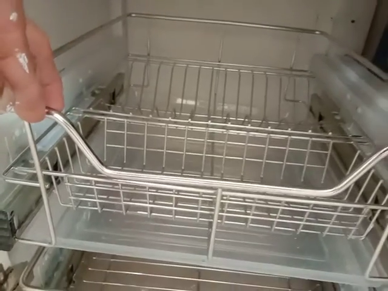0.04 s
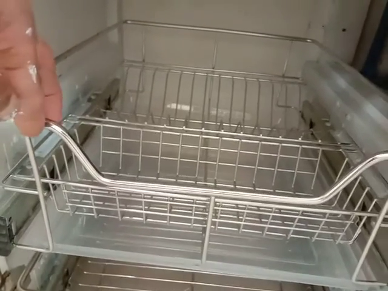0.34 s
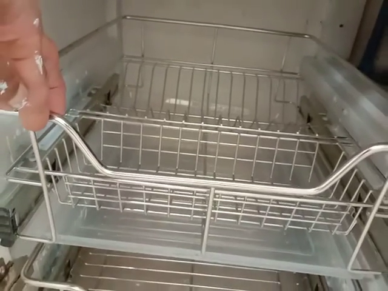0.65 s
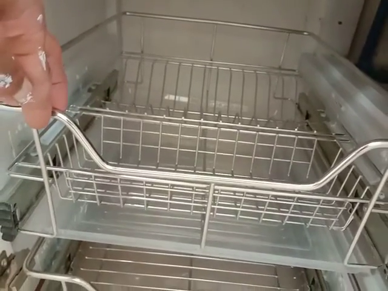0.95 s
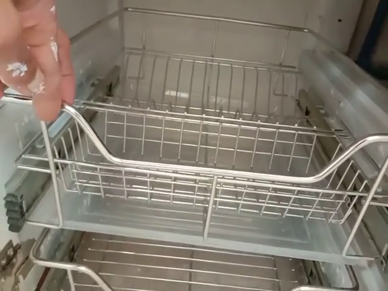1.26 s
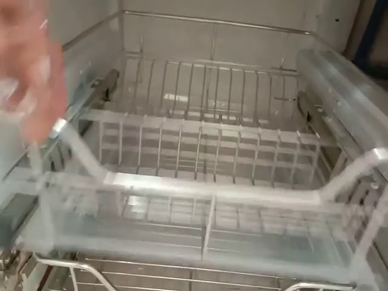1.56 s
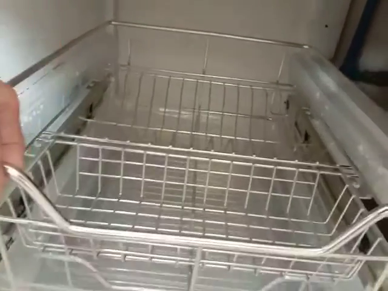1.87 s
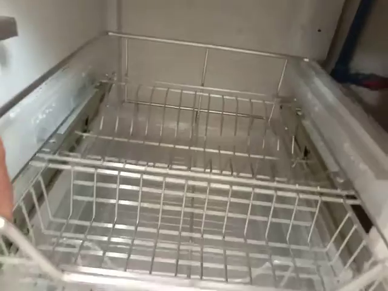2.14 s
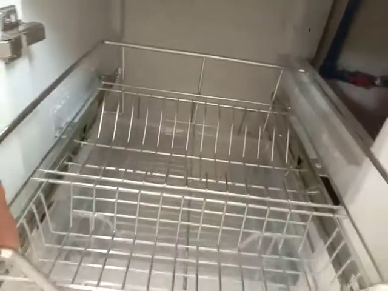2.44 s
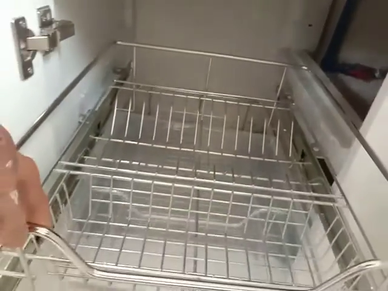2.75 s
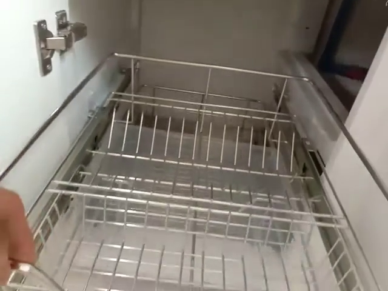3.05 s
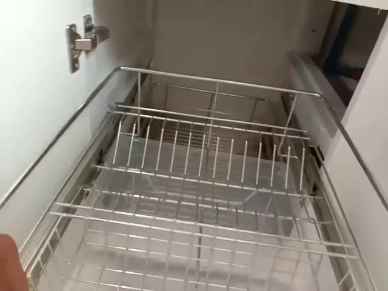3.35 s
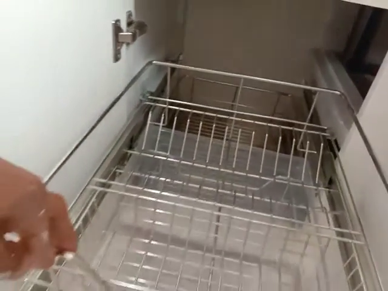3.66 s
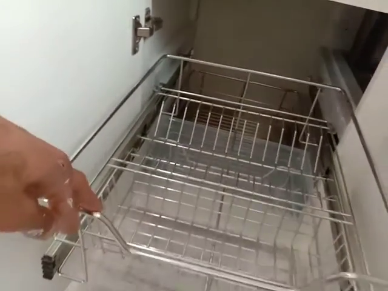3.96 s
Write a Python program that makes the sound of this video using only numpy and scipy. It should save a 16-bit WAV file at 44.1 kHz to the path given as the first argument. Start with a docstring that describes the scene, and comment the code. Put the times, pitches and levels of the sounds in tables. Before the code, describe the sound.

A wire basket drawer rattles lightly at about 0.7 seconds, then starts rolling out of its cabinet with a thump at 1.5 seconds, rumbling and knocking on the rails. A catch ticks around 2.2 and 2.5 seconds. A second, softer pull ends in a sharp, ringing metal clack at 3.4 seconds, and the rattling fades. A strong hiss runs throughout, occasionally swelling into a faint whistle.

```python
"""A wire basket drawer is pulled out of a kitchen cabinet in two goes. The basket shudders when tugged,
its rollers rumble on the rails and jolt over joints, the cabinet booms, and a catch ticks.
At the end stop, metal hits metal: the basket clacks and its wires ring.
A strong hiss that swells now and then into a faint whistle fills the kitchen throughout."""
import sys
import numpy as np
from scipy import signal
from scipy.fft import rfft, irfft
from scipy.io import wavfile
from scipy.ndimage import uniform_filter1d, map_coordinates

SR = 44100
rng = np.random.default_rng(int(sys.argv[2]) if len(sys.argv) > 2 else 0)


def generate_wav(sig):
    """Save sig (samples, or channels by samples) to the path in sys.argv[1] as 16-bit PCM at SR."""
    pcm = np.round(np.clip(np.atleast_2d(sig).T, -1, 1) * 32767).astype(np.int16)
    wavfile.write(sys.argv[1], SR, pcm)


N = 176400
T = np.arange(N) / SR  # time of each sample [s]


def amp(db):
    """Turn decibels into a factor to multiply a sound by."""
    return 10 ** (np.asarray(db) / 20)


def unit(x):
    """Scale a signal to an average strength (rms) of 1."""
    return x / np.sqrt(np.mean(x ** 2))


def curve(rows, column=1):
    """Follow one column of a table over time, joining its points with straight lines."""
    rows = np.array(rows)
    return np.interp(T, rows[:, 0], rows[:, column])


def noise():
    """White noise: all pitches equally strong."""
    return rng.standard_normal(N)


def colour(x, tone):
    """Make some pitches louder and others softer, following (frequency [Hz], gain [dB]) points."""
    hz, db = np.array(tone).T
    freqs = np.maximum(np.arange(N + 1) * SR / (2 * N), 1)
    gain = amp(np.interp(np.log(freqs), np.log(hz), db))
    cepstrum = irfft(np.log(gain))
    # fold it so that the filter never sounds before its input does
    cepstrum[1:N] *= 2
    cepstrum[N + 1:] = 0
    return irfft(rfft(x, 2 * N) * np.exp(rfft(cepstrum)))[:N]


def convolve(x, response):
    """Pass a sound through an object or room, given how that answers one tap."""
    return signal.fftconvolve(x, response)[:N]


def fade(t60, start=0):
    """Jump to 1 at the start, then die away by 60 dB in the fade time of t60 seconds."""
    return (T >= start) * np.exp(-np.log(1000) * np.maximum(T - start, 0) / t60)


def ring(modes):
    """A tapped object rings with several fading tones; the first 20 ms have strength 1."""
    tones = sum((-1) ** k * amp(db) * fade(t60) * np.sin(2 * np.pi * hz * T)
                for k, (hz, db, t60) in enumerate(modes))
    return tones / np.sqrt(np.mean(tones[:882] ** 2))


def push(time, length):
    """A smooth push that adds up to 1; a longer one sounds softer."""
    force = np.exp(-((T - time) / (length / 2)) ** 2)
    return force / force.sum()


def wander(hz):
    """Smooth random motion, mostly slower than hz."""
    freqs = np.arange(N // 2 + 1) * SR / N
    return unit(irfft(rfft(noise()) / (1 + (freqs / hz) ** 2), N))


def flutter(slow_hz, fast_hz):
    """Quick random motion with no slow drift."""
    band = signal.butter(2, [slow_hz, fast_hz], "band", fs=SR, output="sos")
    return unit(signal.sosfilt(band, noise()))


def grains(per_s, spread_db=3.5):
    """Tiny random hits of uneven strength."""
    hits = rng.random(N) < per_s / SR
    return hits * np.sign(noise()) * amp(spread_db * noise())


def resonance(hz, width_hz):
    """Noise gathered around one pitch, which may move."""
    phase = 2 * np.pi * np.cumsum(hz * np.ones(N)) / SR
    return unit(wander(width_hz / 2) * np.cos(phase) + wander(width_hz / 2) * np.sin(phase))


def drift(x, share):
    """Let all pitches of a sound slide up and down together by about this share."""
    position = np.cumsum(1 + share * wander(hz=5))
    return map_coordinates(x, [position], order=3, mode="mirror")


def echoes(x, t60, db):
    """Walls throw the sound back as many fading echoes."""
    tail = noise() * fade(t60, start=0.0024)
    return x + amp(db) * convolve(x, tail / np.linalg.norm(tail))


def hiss():
    """A faintly spitting hiss made of a hollow note, a broad rush, a sharp peak and airy treble."""
    # the hollow note (time [s], pitch [Hz], level [dB])
    hollow = [(0, 802.4, -53), (.58, 794.6, -57.5), (.9, 738, -54.5), (1.25, 856, -67), (1.4, 776, -56),
              (2.5, 800, -56), (3.5, 671.4, -51), (4, 648, -47)]
    # tone of the rush, the peak and the air (frequency [Hz], gain [dB])
    rush_tone = [(25, -18), (70, -24), (130, -10.5), (300, -14.5), (560, -14), (760, -2), (1050, 0.5),
                 (1500, -1.5), (2250, 2.5), (3000, 2.5), (4100, -2), (6000, -3), (9000, -22),
                 (15000, -49.5)]
    peak_tone = [(2500, -30.5), (4200, -18), (4900, -6), (5850, -0.5), (7200, -5.5), (8200, -11.5),
                 (11000, -27.5)]
    air_tone = [(4000, -41), (7500, -2.5), (9700, 1), (11500, -1), (12700, -7.5), (15500, -19)]
    # how the rush and the air rise and fall (time [s], level [dB])
    rush_levels = [(0, -44.5), (.4, -46), (1.4, -45), (2.4, -43.5), (3.22, -42.5), (3.52, -45), (4, -41)]
    air_levels = [(0, -49.5), (2.1, -48), (2.68, -46.5), (3.2, -44), (3.53, -50.5), (3.65, -45), (4, -43)]
    rush_boost_db, peak_db, spit_db, flicker_db = 2, -38.5, -5.5, 0.6
    rush_db = curve(rush_levels) + rush_boost_db
    out = amp(curve(hollow, column=2)) * resonance(curve(hollow), width_hz=130)
    for tone, db in (rush_tone, rush_db), (peak_tone, peak_db), (air_tone, curve(air_levels)):
        spitting = noise() + amp(spit_db) * unit(grains(per_s=1500))
        layer = unit(colour(spitting, tone))
        out = out + layer * amp(db + flicker_db * flutter(slow_hz=7, fast_hz=28))
    return out


def swells():
    """The hiss swells into a wavering whistle with thin, high singing tones."""
    # the swells (peak time [s], half length [s], whistle level [dB], singing level [dB])
    surges = [(0.495, 0.078, -38, -57), (.67, 0.047, -39, -60), (1.15, 0.056, -39.5, -58),
              (1.742, .04, -37, -72), (1.92, 0.068, -40.5, -58), (2.7, 0.14, -35.5, -68),
              (3.175, 0.14, -36.5, -50), (3.66, 0.058, -39.5, -53), (3.887, 0.14, -40.5, -52.5)]
    # the singing tones (pitch [Hz], relative level [dB])
    singing_tones = [(3850, 4.5), (6550, 7.5), (13830, -2)]
    whistle_hz = 5785 * (1 + .02 * wander(hz=10))
    whistle = resonance(whistle_hz, width_hz=870)
    singing = sum(amp(db) * resonance(hz, width_hz=650) for hz, db in singing_tones)
    return sum(np.exp(-((T - t) / half) ** 2) * (amp(whistle_db) * whistle + amp(singing_db) * singing)
               for t, half, whistle_db, singing_db in surges)


def shudders():
    """The basket shudders when the hand tugs it: its wires rattle hollowly over the hum of the frame."""
    # the tugs (time [s], hold [s], pitch of the wires [Hz], level [dB])
    tugs = [(0.671, 0.043, 866, -40.5), (1.488, .135, 1009, -42.5)]
    # the frame's own notes (pitch [Hz], width [Hz], relative level [dB])
    frame_notes = [(154.5, 63, -7.5), (505, 70, -8)]
    out = 0
    for t, hold, wire_hz, db in tugs:
        shake = (T >= t) * (T < t + hold) + fade(t60=.15, start=t + hold)
        frame = sum(amp(note_db) * resonance(hz, width) for hz, width, note_db in frame_notes)
        out = out + amp(db) * shake * (resonance(wire_hz, width_hz=230) + frame)
    return out


def clacks():
    """Metal hits metal: a crack, then the wires clatter against each other and ring."""
    # a light hit at the first tug, then a quick bounce at the end stop (time [s], level [dB])
    hits = [(0.676, -42), (3.3748, -24.5), (3.3766, -22), (3.381, -38)]
    # tone of the crack and the clatter (frequency [Hz], gain [dB])
    crack_tone = [(200, -9), (800, 1.5), (1500, -20), (2400, 7.5), (3100, -2), (3900, -10), (5000, -3.5),
                  (6900, 3), (8500, -6.5), (15000, -21)]
    clatter_tone = [(300, -17), (2800, -1.5), (5000, -17)]
    # the wires' own notes (pitch [Hz], relative level [dB], fade time [s])
    wire_notes = [(1018, -10, 0.2), (2400, -8, 0.1), (2570, -12, 0.14), (2960, 4, 0.14), (4750, 5, 0.13),
                  (7030, -2, 0.16)]
    clatter_db, ring_db = -11, -7.5
    crack = unit(colour(noise(), crack_tone))
    crack *= sum(amp(db) * fade(t60=0.052, start=t) for t, db in hits)
    clatter = unit(colour(grains(per_s=900), clatter_tone))
    clatter *= sum(amp(db + clatter_db) * fade(t60=0.19, start=t) for t, db in hits)
    taps = sum(amp(db) * (np.arange(N) == int(t * SR)) for t, db in hits)
    return crack + clatter + amp(ring_db) * convolve(taps, ring(wire_notes))


def rolling(body):
    """Rollers run over tiny bumps in the rails and shake the cabinet: a low rumble, a brighter rattle."""
    # the two pulls (time [s], rumble level [dB], rattle level [dB])
    pulls = [(1.42, -67, -75), (1.475, -52, -67), (1.5, -23.5, -34), (1.6, -30.5, -29), (1.68, -27, -47.5),
             (1.8, -44, -53.5), (1.88, -37.5, -45.5), (1.96, -35, -38), (2.1, -36, -37), (2.25, -36.5, -37),
             (2.35, -35, -36.5), (2.44, -42, -65), (2.58, -64, -47), (2.66, -47, -52), (2.76, -40.5, -46),
             (2.86, -36, -40), (3.32, -40, -38.5), (3.45, -50, -35), (3.52, -42.5, -45), (3.62, -46, -55),
             (3.69, -69, -96), (3.85, -51, -55), (3.98, -79, -61)]
    # tone of the rumble and the rattle (frequency [Hz], gain [dB])
    rumble_tone = [(25, -35), (60, -26), (90, -4), (120, 0), (185, 5), (240, 1), (320, -9.5), (500, -20.5),
                   (2000, -48)]
    rattle_tone = [(60, -17.5), (230, -19), (330, 2.5), (450, 0), (700, -4), (1050, -8.5), (1400, -2),
                   (3000, 14), (9000, -5)]
    trim_db = -1.5
    out = 0
    for tone, db in (rumble_tone, curve(pulls)), (rattle_tone, curve(pulls, column=2)):
        shaking = convolve(grains(per_s=900), body)
        sliding = drift(shaking, share=.025)  # the notes slide as the rollers' load shifts
        layer = colour(sliding, tone)
        strength = np.sqrt(uniform_filter1d(layer ** 2, size=3000) + 1e-18)
        out = out + layer / strength * amp(db + trim_db)  # even it out, then follow the pulls
    return out * (T > pulls[0][0])


def jolts(body):
    """Each jolt over a rail joint booms in the cabinet and sets the loose basket chattering."""
    # the jolts (time [s], boom gain [dB], chatter level [dB], contact time [s], chatter cut-off [Hz])
    bumps = [(1.484, -35, -32, 0.002, 1150), (1.5, -15, -41, 0.0032, 1210),
             (1.52, -20.5, -30.5, 0.0024, 9200), (1.604, -28, -35, 0.0063, 1300),
             (2.22, -25.5, -29.5, 0.0019, 700), (2.603, -26.5, -25.5, 0.0015, 600),
             (3.228, -32.5, -41, 0.0012, 710), (3.378, -18.5, -28.5, 0.0027, 3930),
             (3.398, -26, -48, 0.00064, 2570)]
    # tone of the boom and the chatter (frequency [Hz], gain [dB])
    boom_tone = [(30, -15), (95, -24.5), (160, 0)]  # the cabinet gives off little deep bass
    chatter_tone = [(50, -23), (110, -5), (175, 4), (310, -3.5), (430, -4), (620, -4.5), (1030, -13.5),
                    (1300, -9.5), (2800, -10.5), (12000, -16.5)]
    chatter_fade_s, chatter_rise_s = 0.48, 0.0029
    force = sum(amp(db) * push(t, contact) for t, db, _, contact, _ in bumps)
    out = colour(convolve(force, body), boom_tone)
    chatter = unit(colour(noise(), chatter_tone))
    for t, _, db, _, cutoff_hz in bumps:
        shake = amp(db) * (fade(chatter_fade_s, t) - fade(chatter_rise_s, t))
        muffle = signal.butter(3, cutoff_hz, fs=SR, output="sos")
        out = out + signal.sosfilt(muffle, shake * chatter)
    return out


def drone():
    """The rollers hum briefly at a pitch that follows their speed."""
    # the hum rises as the first pull gathers speed (time [s], pitch [Hz], level [dB])
    hum = [(1.87, 185, -51), (1.91, 186.4, -26), (1.96, 176, -30), (2.01, 226, -32), (2.07, 240.3, -29.5),
           (2.15, 238, -48)]
    jitter_share, waver_db = 0.04, 3.5
    hz = curve(hum) * (1 + jitter_share * wander(hz=25))
    db = curve(hum, column=2) + waver_db * wander(hz=22)
    humming = (T > hum[0][0]) * (T < hum[-1][0])
    return amp(db) * np.sin(2 * np.pi * np.cumsum(hz) / SR) * humming


def ticks():
    """The small steel parts of the rail's catch snap with a bright, dense ring."""
    # the snaps (time [s], level [dB])
    snaps = [(2.235, -39.5), (2.262, -39.5), (2.4967, -26), (2.511, -48)]
    # tone of the steel (frequency [Hz], gain [dB])
    steel_tone = [(1000, -26), (3200, -21), (5500, -7), (7300, 3), (9000, -3), (11500, -3), (15000, -11)]
    loudness = sum(amp(db) * fade(t60=0.21, start=t) for t, db in snaps)
    return unit(colour(noise(), steel_tone)) * loudness


def scene():
    """The drawer in a small kitchen, over a hiss echoing off nearby walls; both channels are alike."""
    # the notes of drawer and cabinet (pitch [Hz], relative level [dB], fade time [s])
    body_notes = [(113.8, -9, 0.43), (136.5, -9, 0.16), (172, 0, 0.13), (195.8, 0, 0.21), (234.7, -1, 0.21),
                  (286.6, 2, 0.081), (320, -2, 0.071), (413.6, -4.5, 0.098), (483, -5.5, 0.11),
                  (540, -2, 0.035), (655, -7.5, 0.12), (857, -5, 0.058), (1008, -4, 0.093)]
    body = ring(body_notes)
    drawer = shudders() + drone() + rolling(body) + jolts(body) + clacks() + ticks()
    wall_db = -8
    hissing = echoes(hiss() + swells(), t60=0.12, db=wall_db)
    hissing /= np.hypot(1, amp(wall_db))  # the echoes add no loudness
    mix = echoes(drawer, t60=0.74, db=-10) + hissing
    return np.array([mix, mix])


def record(dry):
    """Thin out the deep bass and cut off the highest treble."""
    low_cut_hz, top_hz = 65, 15520
    bass_cut = signal.butter(2, low_cut_hz, "high", fs=SR, output="sos")
    treble_cut = signal.ellip(12, .1, 90, top_hz, fs=SR, output="sos")
    return signal.sosfilt(treble_cut, signal.sosfilt(bass_cut, dry))


dry = scene()
out = record(dry)
generate_wav(out)
```